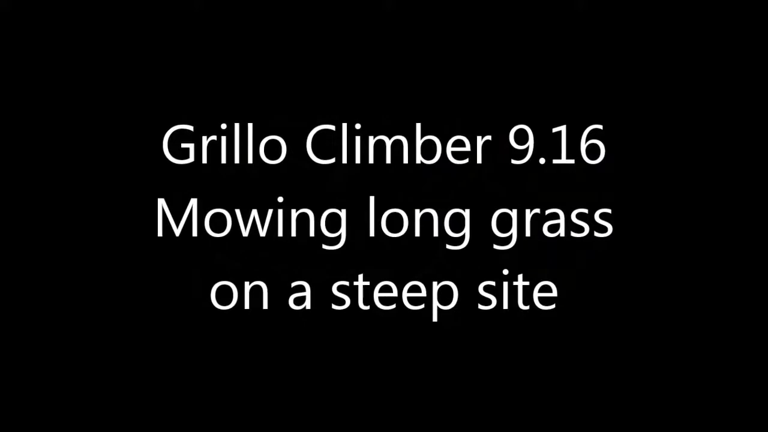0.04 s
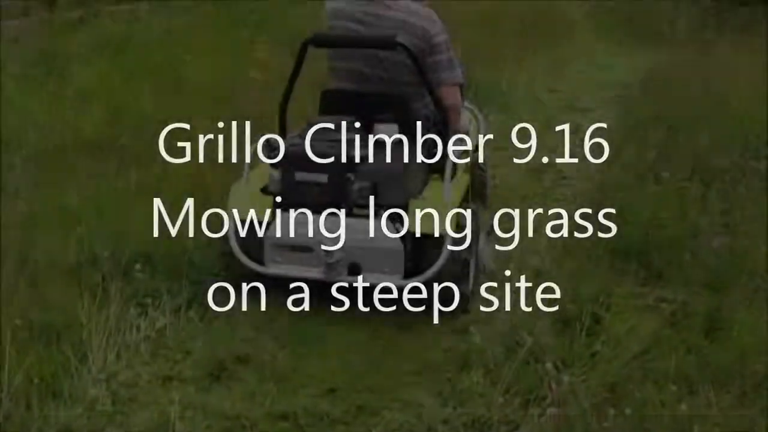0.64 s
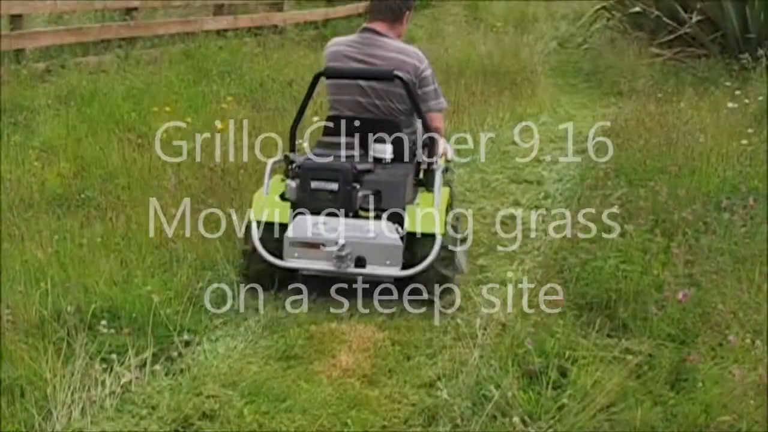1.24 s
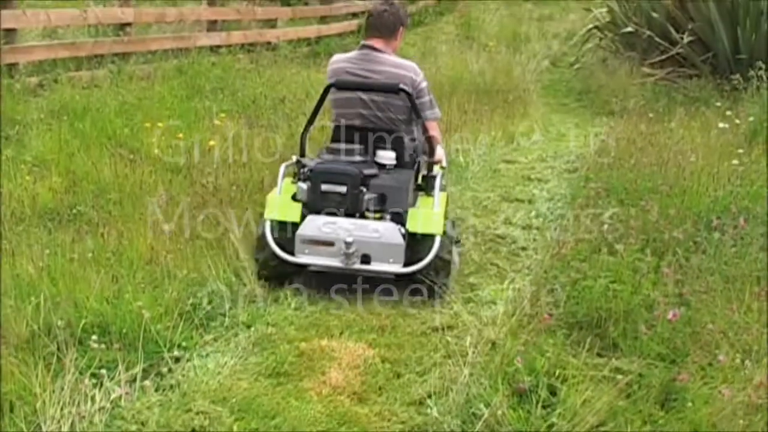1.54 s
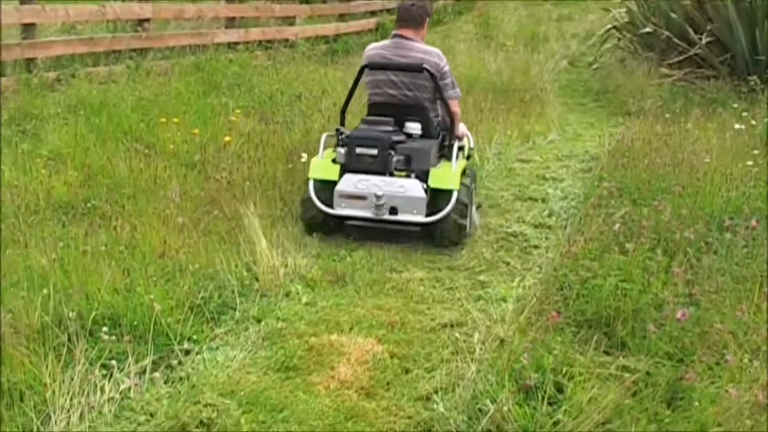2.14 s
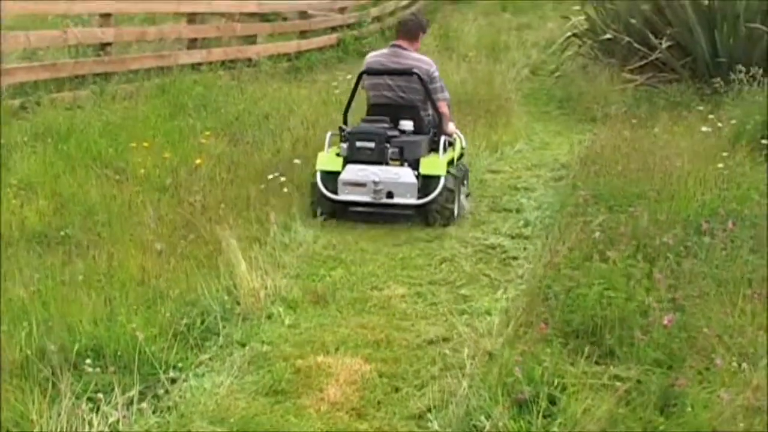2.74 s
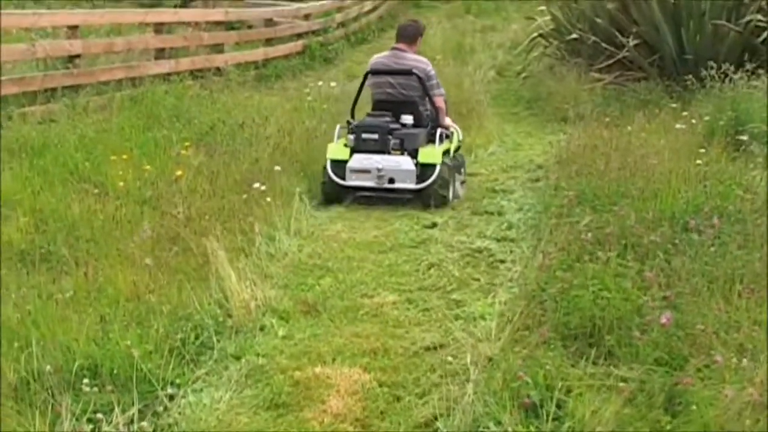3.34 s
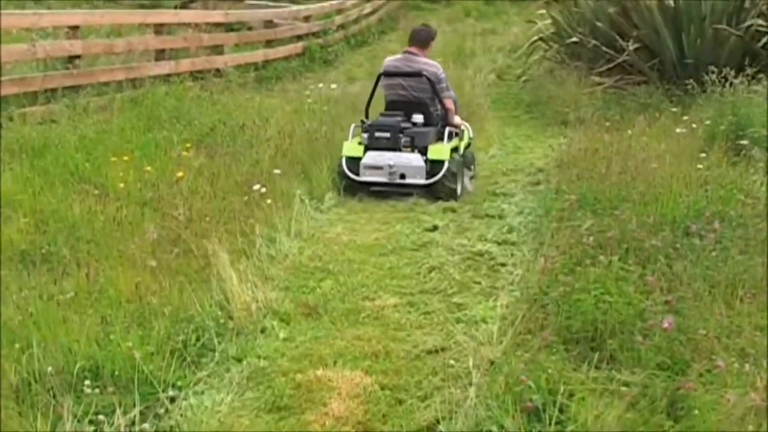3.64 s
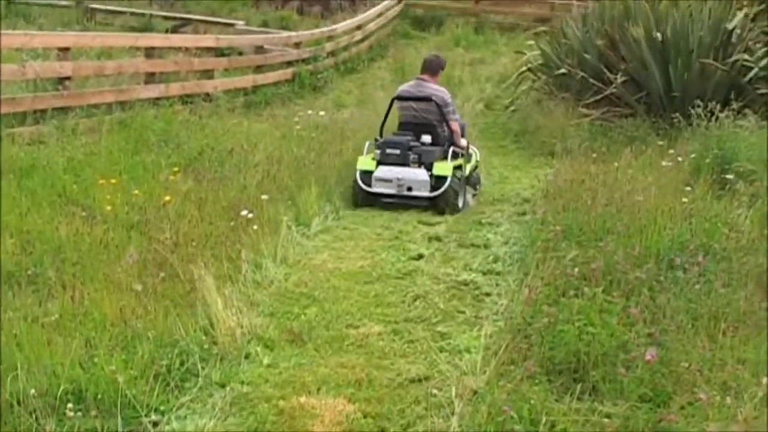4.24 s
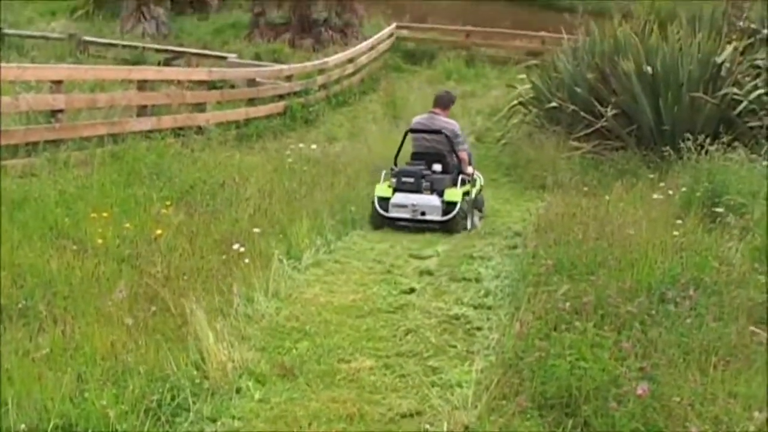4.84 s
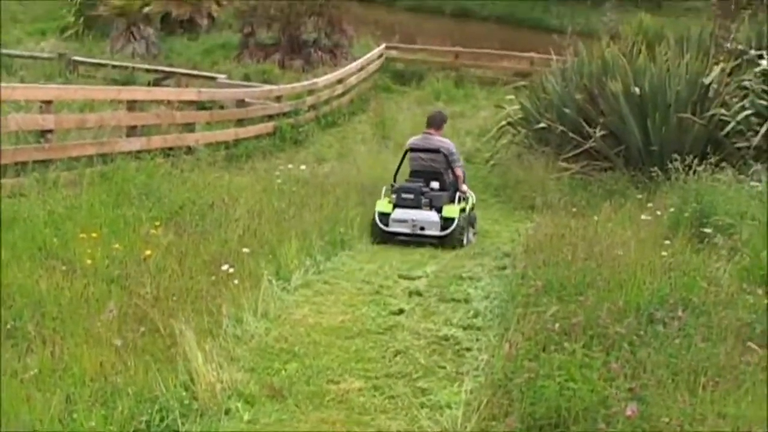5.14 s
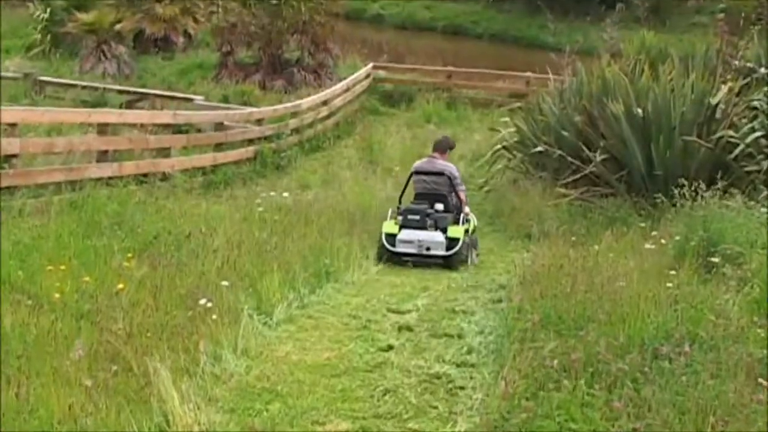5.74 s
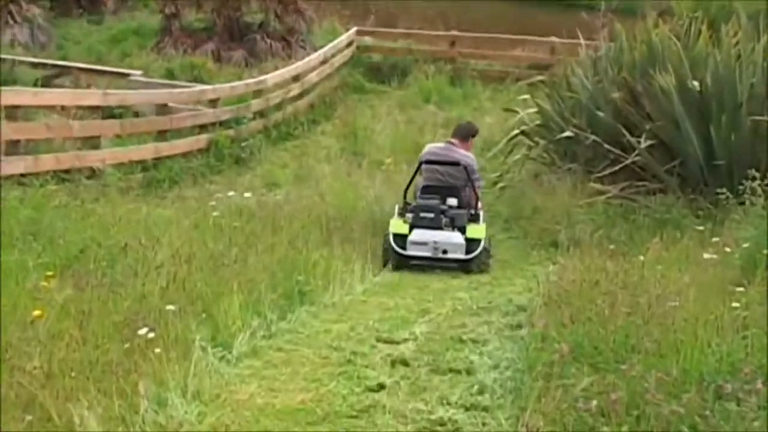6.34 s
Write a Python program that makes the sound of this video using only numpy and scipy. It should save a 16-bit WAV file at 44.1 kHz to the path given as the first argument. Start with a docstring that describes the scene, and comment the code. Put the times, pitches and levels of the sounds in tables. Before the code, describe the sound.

Outdoors, a riding mower drives away from a stereo microphone through long grass. A throbbing, clattering engine and the broad hiss of the cutting blade continue throughout, with a few tiny squeaks near the start and short ringing rasps as tufts are cut. The engine strains briefly, then grows a little quieter with distance. Soft wind buffets come and go, and two faint low hoots close the scene.

```python
"""A ride-on mower on a slope of long grass, driving away from a stereo microphone in a light breeze.
Close by at first, its V-twin, governed near 3270 rpm, thumps in uneven pairs; valves clatter, the fan
whines, the belt-driven blade rushes and shreds. Metal squeaks at 0.6 s; from 1 s gusts rumble on the
microphone and the blade bites into tufts. Near 3 s the engine labours in the thickest grass. From 4 s,
farther up the slope, the exhaust fades and thins, and two faint hoots sound just after 6 s."""
import sys
import numpy as np
from scipy import signal
from scipy.fft import rfft, irfft, next_fast_len
from scipy.io import wavfile
from scipy.ndimage import map_coordinates

SR = 44100
rng = np.random.default_rng(int(sys.argv[2]) if len(sys.argv) > 2 else 0)


def waveform_to_disk(signal):
    """Save audio, clipped to [-1, 1], as 16-bit WAV at the path in sys.argv[1]."""
    frames = np.transpose(np.atleast_2d(signal))
    scaled = np.clip(frames, -1, 1) * 32767
    samples = np.round(scaled).astype(np.int16)
    wavfile.write(sys.argv[1], SR, samples)


N = 286209
T = np.arange(N) / SR


def from_db(db):
    """Decibels to gain."""
    return 10 ** (np.asarray(db) / 20)


def rms_one(x):
    """Scale to unit power."""
    return x / np.sqrt(np.mean(x ** 2) + 1e-20)


def in_time(rows):
    """Each column of a timed curve at every sample."""
    s, *columns = np.transpose(rows)
    return [np.interp(T, s, c) for c in columns]


def swell(s, half_s):
    """Bell-shaped envelope peaking at time s."""
    return np.exp(-((T - s) / half_s) ** 2)


def drift(per_s):
    """Smooth random wander of unit power."""
    knots = rng.standard_normal(8192)
    coarse = T[::20]
    return rms_one(np.interp(T, coarse, map_coordinates(knots, [coarse * per_s], order=3, mode="wrap")))


def colour(x, spectrum):
    """Minimum-phase filter through points of f/Hz, gain/dB."""
    size = next_fast_len(N + SR // 2, True)
    size += size % 2
    hz, db = np.transpose(spectrum)
    bins = np.maximum(np.fft.rfftfreq(size, 1 / SR), 1)
    cepstrum = irfft(np.log(from_db(np.interp(np.log(bins), np.log(hz), db))))
    cepstrum[1:size // 2] *= 2
    cepstrum[size // 2 + 1:] = 0
    return irfft(rfft(x, size) * np.exp(rfft(cepstrum)), size)[..., :N]


def strokes(turns, place, spread_db, jitter_s):
    """One click each time a shaft passes a place, a little uneven in size and timing."""
    at = np.flatnonzero(np.diff(np.floor(turns - place)) > 0)
    timing, size = rng.standard_normal((1024, 2))[:len(at)].T
    at += np.round(timing * jitter_s * SR).astype(int)
    clicks = np.zeros(N)
    clicks[np.clip(at, 0, N - 1)] = from_db(spread_db * size)
    return clicks


def burst(decay_s):
    """A dying ring of many dense modes, with unit energy."""
    t = T[:int(4 * decay_s * SR) + 1]
    ring = rng.standard_normal(SR)[:len(t)] * np.exp(-t / decay_s)
    return ring / np.linalg.norm(ring)


def puffs(clicks, decay_s):
    """Fresh noise that dies away after each click."""
    power = signal.lfilter([1], [1, -np.exp(-2 / (decay_s * SR))], clicks ** 2)
    return rms_one(np.sqrt(power) * rng.standard_normal(N))


# engine speed: t/s, four-stroke cycle rate/Hz
ENGINE_SPEED = [(0.0, 27.423), (0.35, 27.46), (0.55, 27.319), (0.95, 27.208), (1.5, 27.384), (1.75, 27.248),
                (2.15, 27.243), (2.45, 26.867), (2.8, 26.656), (3.2, 27.045), (3.55, 27.06), (4.0, 27.383),
                (4.2, 27.301), (4.8, 27.321), (5.4, 27.134), (5.9, 27.222), (6.12, 27.386), (6.49, 27.2)]

def crankshaft():
    """Cycles turned, and a load of 0-1 that rises as thick grass drags the speed down."""
    speed = in_time(ENGINE_SPEED)[0]
    return .05 + np.cumsum(speed) / SR, np.interp(speed, [27.0, 27.17], [1, 0])


# the two cylinders blow down: place/cycles, level/dB
FIRINGS = [(-.05, 0), (.308, -.8)]
# muffler colour: f/Hz, close/dB, labouring/dB, far/dB
MUFFLER = [(25, -52, -53, -45), (55.1, -8, -13, -8), (82, -14.5, -6.5, -20), (107, -4, -17, -14),
           (135.7, 4.5, 1.5, -1.5), (165, 1, 2, -6.5), (218, -1, 2, 1.5), (249, -5.5, -2.5, -5),
           (302, -9, -5.5, -8.5), (329, -16.5, -10, -16.5), (362, -12.5, -11, -18), (447, -29, -20.5, -31),
           (900, -30, -32, -25), (3000, -74, -66, -61)]
# blend of those colours on the way up the slope: t/s, labouring/0-1, far/0-1
MUFFLER_BLEND = [(1.9, 0.2, 0.14), (2.5, 0.4, 0.08), (2.85, 0.4, 0), (3.17, 1, 0.03), (3.55, 1, 0),
                 (3.85, 0.26, 0), (4.05, .3, 0.24), (4.5, 0.07, 0.4), (4.92, 0, .05), (5.45, 0.2, 0.62),
                 (6.1, 0, 1), (6.49, 0, 0.35)]
# colour of the turbulent gas: f/Hz, level/dB
EXHAUST_PUFF = [(40, -37.5), (100, -10), (170, 5.5), (240, 6.5), (350, -1), (430, -17), (520, -1.5),
                (1500, -37)]
# exhaust, falling with distance from the microphone: t/s, level/dB
EXHAUST_LEVEL = [(0.15, -17.5), (0.6, -18), (1.02, -17), (1.25, -18.5), (1.6, -18.5), (1.85, -17),
                 (2.45, -17.5), (2.95, -17), (3.17, -16), (3.3, -18), (3.6, -18), (3.9, -15),
                 (3.985, -22.3), (4.3, -22), (4.5, -21.5), (4.92, -20.5), (5.08, -21.3), (5.5, -23),
                 (6.1, -24), (6.49, -24.5)]

def exhaust(cycles, load):
    """Uneven pairs of gas pulses ring the muffler, barking under load and thinning with distance."""
    pulses = sum(from_db(db) * strokes(cycles, place, spread_db=.38, jitter_s=.00006)
                 for place, db in FIRINGS)
    close, labouring, far = (rms_one(colour(pulses, np.array(MUFFLER)[:, [0, k]])) for k in (1, 2, 3))
    labour, distance = in_time(MUFFLER_BLEND)
    near = (1 - labour) * close + labour * labouring
    muffled = (1 - distance) * near + distance * far
    gas = rms_one(colour(puffs(pulses, decay_s=.0072), EXHAUST_PUFF))
    turbulence = from_db(-13 + 2.5 * load) * gas
    return from_db(in_time(EXHAUST_LEVEL)[0] + .36 * drift(9)) * (turbulence - muffled)


# valve and piston knocks: place/cycles, level/dB
KNOCKS = [(0.044, -9), (0.204, -10), (0.317, -7), (.51, -6), (0.671, -9), (.75, -8), (.95, -8.5)]
# clatter close to the microphone: f/Hz, level/dB
CLATTER_NEAR = [(100, -26), (300, -0.5), (460, -4), (560, 2), (820, 3.5), (920, -1.5), (1060, 5.5),
                (1170, -2), (1380, -0.5), (1680, -6.5), (1830, -5.5), (2050, -2.5), (2200, -5.5),
                (2450, -9), (5000, -13), (12000, -47)]
# from far up the slope, where the ground echo shifts the notches: f/Hz, level/dB
CLATTER_FAR = [(100, -17), (300, -2), (430, -15), (560, -2), (720, -0.5), (1020, 0), (1130, -2),
               (1250, 2.5), (1470, -10), (1720, -1.5), (1950, -3), (2200, -12.5), (5000, -21), (12000, -50)]

def clatter(cycles, away, loose_db=9.5):
    """Each knock rings the block in its own repeating way and shakes loose parts."""
    knocks = [from_db(db) * strokes(cycles, place, spread_db=.94, jitter_s=.00008)
              for place, db in KNOCKS]
    block = sum(signal.oaconvolve(k, burst(decay_s=.0023))[:N] for k in knocks)
    rattle = rms_one(block) + from_db(loose_db) * puffs(sum(knocks), decay_s=.014)
    near, far = (rms_one(colour(rattle, spectrum)) for spectrum in (CLATTER_NEAR, CLATTER_FAR))
    return (1 - away) * near + away * far


# engine tones locked to the crank and fan whine: multiple of the cycle rate, close/dB, far/dB, labouring/dB
FAN_PARTIALS = [(7, -18, -18.5, -11), (10, -39, -32, -32), (12, -17, -16, -14), (16.06, -19.5, -27, -24),
                (19.94, -13.5, -15, -15.5), (23.98, -13, -19.5, -26), (29.99, -9, -10.5, -18),
                (32.1, -32, -17, -12.5), (36, -15, -12, -15.5), (38, -20, -15, -16), (39.5, -22, -19, -28),
                (46, -17.5, -17, -24), (50.6, -16, -17, -17), (67.3, -22.5, -22, -29),
                (71.6, -24, -16, -34), (80.6, -18, -46, -33)]

def fan(cycles, away, load):
    """Tones locked to the crank waver as the machine rocks; distance and load shift their balance."""
    angle = 2 * np.pi * (cycles + .0008 * drift(20))
    out = 0
    for k, near_db, far_db, labouring_db in FAN_PARTIALS:
        db = (1 - load) * ((1 - away) * near_db + away * far_db) + load * labouring_db
        out += np.sqrt(2) * from_db(db + drift(4.13)) * np.sin(k * angle)
    return out


# clatter and fan together: t/s, relative level/dB
ENGINE_LEVEL = [(0.15, -21), (1.2, -21), (1.5, -19), (1.95, -20), (2.35, -22), (2.8, -20.5), (3.5, -22.5),
                (4.0, -23), (4.9, -23), (5.2, -24), (5.7, -24.5), (6.49, -24.5)]

def engine(cycles, load):
    """Clatter and fan change from their close to their far colour as the mower climbs."""
    away = np.interp(T, [1.2, 3.8], [0, 1])
    return from_db(in_time(ENGINE_LEVEL)[0] - 1.4) * (fan(cycles, away, load) + clatter(cycles, away))


# colour of the rush under the deck: f/Hz, level/dB
DECK_COLOUR = [(40, -5), (100, -3.5), (200, -1.5), (320, 4), (430, -7), (800, 3), (1500, -1), (2400, 0.5),
               (3050, -1), (3850, 1.5), (4300, -0.2), (5600, -2), (6500, -6), (7500, -6.5), (9000, -10.5),
               (12500, -11), (15500, -39)]
# blade drone, beating against the exhaust: multiple of the blade's turning rate, level/dB
BLADE_HUM = [(1, -25), (2, -19), (3, -15.5), (4, -14), (7, -24)]
# cutting, swelling in thicker grass: t/s, relative level/dB
CUTTING_LEVEL = [(0.152, -28.5), (1.15, -29.5), (2.03, -27), (2.35, -30), (2.5, -28), (2.8, -27),
                 (3.0, -28.7), (3.35, -26), (3.85, -27.5), (4.1, -28), (4.55, -26), (4.95, -27), (5.4, -27),
                 (5.7, -28), (6.49, -28.5)]
BLADE_RATIO = 1.837  # blade turns per engine cycle

def cutting(cycles, stalks_per_s=500):
    """Air rushes off both blade tips, stalks snap as they pass, and the blade drones."""
    blade = 2 * np.pi * BLADE_RATIO * cycles
    crank = 2 * np.pi * cycles
    swish = .046 * (np.cos(blade) + np.cos(2 * blade))
    throb = .095 * (np.cos(crank) + np.cos(3 * crank))  # the engine's uneven pull
    sweep = np.exp(swish + throb)
    cut = rng.random(N) < stalks_per_s * sweep * from_db(3 * drift(14)) / SR
    snaps = cut * rng.choice([-1, 1], N) * from_db(2.5 * np.minimum(rng.exponential(1, N), 4))
    shredding = rms_one(snaps) + puffs(snaps, decay_s=.0029)
    air = rng.standard_normal(N) * sweep * from_db(.31 * drift(20))
    rush = rms_one(colour(air + from_db(-7) * shredding, DECK_COLOUR))
    hum = sum(np.sqrt(2) * from_db(db + .39 * drift(3.25)) * np.sin(k * blade) for k, db in BLADE_HUM)
    return from_db(in_time(CUTTING_LEVEL)[0] + 4) * (rush + hum)


# wind on the microphone: f/Hz, level/dB
WIND_COLOUR = [(12, -18), (28, -9), (60, 3), (100, -4.5), (160, -5), (300, -18), (600, -29), (3000, -58)]
# light air between gusts: t/s, relative level/dB
LIGHT_AIR = [(0.15, -37), (3.9, -33.5), (4.3, -49), (5.3, -42), (6.49, -35)]

def breeze(gust_strength):
    """Air crossing the microphone makes a lumpy rumble, mostly opposed in its two ports."""
    common, opposed = colour(rng.standard_normal((2, N)), WIND_COLOUR)
    rumble = from_db(-28) * rms_one(common) + rms_one(opposed) * np.array([[1], [-1]])
    strength = np.hypot(from_db(in_time(LIGHT_AIR)[0]), gust_strength)
    return strength * from_db(.5 - drift(18)) * rumble


# high metal squeaks early on, low hoots at the end: t/s, f/Hz, half-length/s, level/dB
SQUEAKS_AND_HOOTS = [(0.601, 7330, .011, -23), (0.619, 7340, 0.007, -17.5), (.648, 7300, 0.018, -34),
                     (1.983, 7230, 0.018, -30.5), (2.022, 7230, .01, -32), (2.165, 7210, .022, -42),
                     (2.255, 7140, .035, -40.5), (6.1, 550, .035, -33.5), (6.225, 498, .03, -31.5)]

def squeaks_and_hoots(wobble_hz=70.3, flicker_db=5.5):
    """Short swelling tones that flicker in pitch and strength."""
    out = np.zeros(N)
    for s, hz, half_s, db in SQUEAKS_AND_HOOTS:
        phase = 2 * np.pi * np.cumsum(hz + wobble_hz * drift(400)) / SR
        out += np.sqrt(2) * from_db(db) * swell(s, half_s) * np.sin(phase)
    return out * from_db(flicker_db * drift(70))


# gusts at the microphone: t/s, half-length/s, relative level/dB, dip/dB
GUSTS = [(1.032, .035, -18, 0.5), (1.17, .04, -20, 0.5), (1.567, 0.21, -25, 1), (2.624, 0.2, -25, 0.5),
         (2.938, 0.15, -30, 0), (3.527, .1, -29, -0.5), (3.91, 0.05, -18.5, 2.5), (5.02, 0.12, -28, 1.4),
         (5.58, 0.096, -19.5, 1.4), (6.056, 0.14, -25, 0.8)]

def gusts(attack_s=.038, hold_s=.13, release_s=.16):
    """Strength of the gusts, and a gain for the mower that dips briefly at most of them."""
    strength = sum(from_db(db) * swell(s, half_s) for s, half_s, db, _ in GUSTS)
    corners = [-attack_s, 0, hold_s, hold_s + release_s]
    dip_db = sum(depth * np.interp(T - s, corners, [0, 1, 1, 0]) for s, _, _, depth in GUSTS)
    return strength, from_db(-dip_db)


# modes of the steel deck: f/Hz, width/Hz, level/dB
DECK_MODES = [(660, 120, -6), (1005, 140, 1), (1270, 71, 1), (1720, 100, -3), (2090, 53, -6),
              (2310, 150, -7), (3740, 190, -2.5)]
# thick tufts in the mower's path: t/s, half-length/s, ring level/dB, rasp f/Hz, rasp level/dB
TUFTS = [(1.224, 0.079, -35, 2100, -36), (1.478, 0.053, -30, 2100, -33), (1.63, 0.046, -38, 2100, -31),
         (1.79, 0.05, -32, 1900, -31), (2.106, 0.057, -40, 2800, -37), (2.256, 0.093, -39, 2750, -35),
         (3.42, .09, -26, 2750, -34), (4.31, 0.057, -24, 1880, -36), (4.557, 0.054, -29, 2830, -40),
         (4.8, 0.047, -27, 2750, -32), (4.944, 0.062, -24.5, 2750, -32), (5.18, .08, -25.5, 2700, -30),
         (5.38, 0.1, -30, 2520, -34)]

def tuft_bites(cycles, band_ratio=1.135):
    """Each blade tip rasps through a tuft and flings stalks against the deck, which rings."""
    tips = strokes(2 * BLADE_RATIO * cycles, 0, spread_db=2.5, jitter_s=.0011)
    spray = puffs(tips, decay_s=.013)
    ringing, out = np.zeros((2, N))
    for k, (hz, width, db) in enumerate(DECK_MODES):
        mode = signal.lfilter(*signal.iirpeak(hz, hz / width, fs=SR), spray)
        ringing += (-1) ** k * from_db(db) * rms_one(mode)
    for s, half_s, ring_db, hz, rasp_db in TUFTS:
        band = signal.butter(2, [hz / band_ratio, hz * band_ratio], "band", fs=SR, output="sos")
        rasp = rms_one(signal.sosfilt(band, spray))
        out += (from_db(ring_db) * rms_one(ringing) + from_db(rasp_db) * rasp) * swell(s, half_s)
    return out


# the microphone's left port over its right: f/Hz, level/dB
PORT_BALANCE = [(60, -3.5), (91, -3), (140, -0.5), (210, -1.5), (310, 1), (470, -3), (720, 1.5),
                (1080, -0.5), (1640, -0.5), (2480, -2), (3740, -2), (5660, -3), (8550, -0.5), (12900, -2.5)]
# scatter off grass and fence: f/Hz, relative level/dB
SCATTER = [(100, -20.5), (500, -19.5), (1000, -10.5), (2500, -9), (5500, -9.5), (8500, -15), (11000, -8.5),
           (13500, -43)]

def across_field(x, lag_s, scatter_db):
    """Sound reaches the right port first, its treble louder there; each port gets its own scatter."""
    size = 2 * next_fast_len(N)
    hz, sides = np.fft.rfftfreq(size, 1 / SR), np.array([[1], [-1]])
    at_hz, pan_db = np.transpose(PORT_BALANCE)
    pan = from_db(sides * np.interp(np.log(hz + 1), np.log(at_hz), pan_db) / 2)
    delay = np.exp(-1j * np.pi * hz * lag_s * sides)
    direct = irfft(rfft(x, size) * pan * delay)[:, :N]
    scattered = np.array([signal.oaconvolve(x, burst(decay_s=.05))[:N] for side in range(2)])
    return direct + from_db(scatter_db) * colour(scattered, SCATTER)


def scene():
    """One crankshaft drives the mower out on the slope; the wind blows right at the microphone."""
    cycles, load = crankshaft()
    motor = exhaust(cycles, load) + engine(cycles, load)
    deck = cutting(cycles)
    mower = across_field(motor, lag_s=.000032, scatter_db=-1)
    deck += tuft_bites(cycles) + squeaks_and_hoots()
    mower += across_field(deck, lag_s=.000036, scatter_db=-1.5)
    gust_strength, dips = gusts()
    return dips * mower + breeze(gust_strength)


def record(dry):
    """The microphone opens and closes abruptly and loses the deepest bass and the top."""
    start_s, low_cut_hz, high_cut_hz = .149, 40, 14800
    gate = np.clip(np.minimum(T - start_s, T[-1] - T) * 1000, 0, 1)
    lean = signal.sosfilt(signal.butter(2, low_cut_hz, "high", fs=SR, output="sos"), dry * gate)
    return signal.sosfilt(signal.ellip(10, .1, 90, high_cut_hz, fs=SR, output="sos"), lean)


dry = scene()
out = record(dry)
waveform_to_disk(out)
```